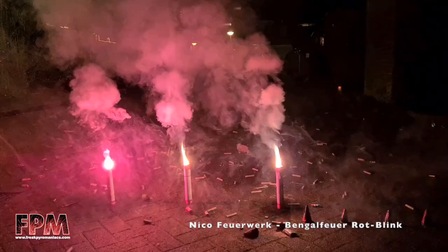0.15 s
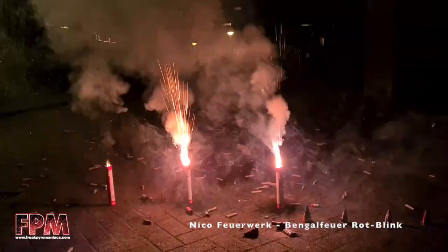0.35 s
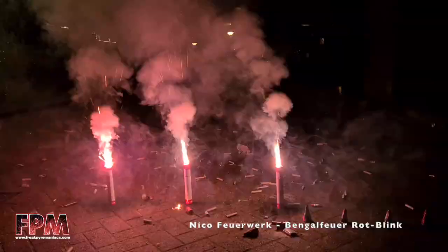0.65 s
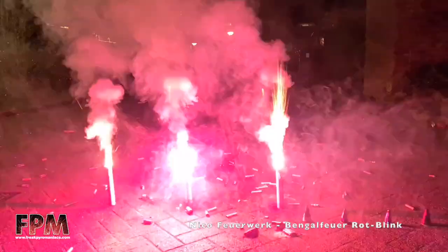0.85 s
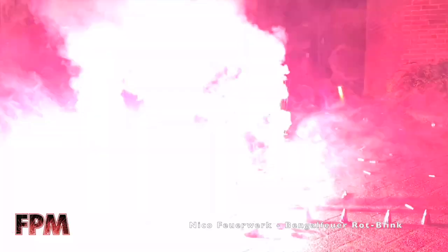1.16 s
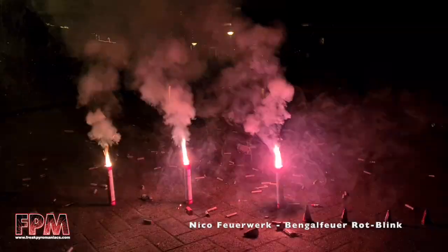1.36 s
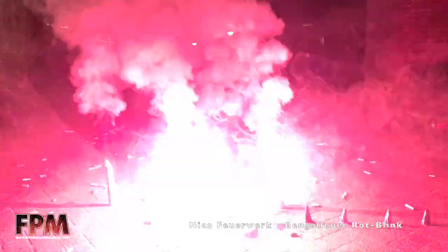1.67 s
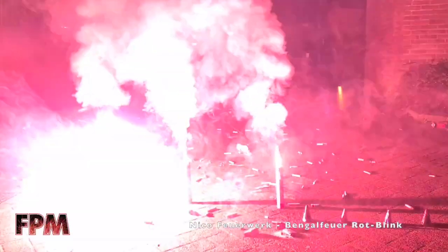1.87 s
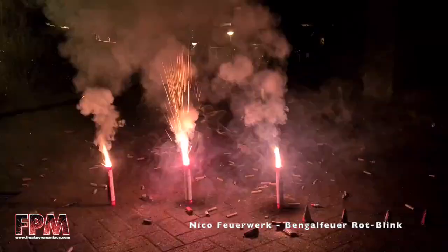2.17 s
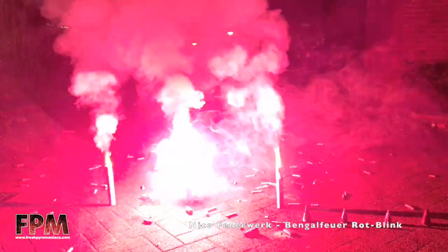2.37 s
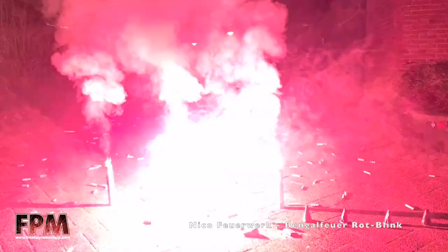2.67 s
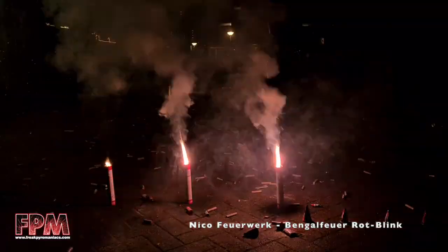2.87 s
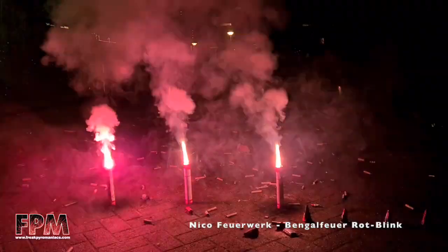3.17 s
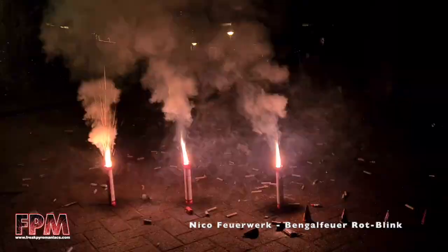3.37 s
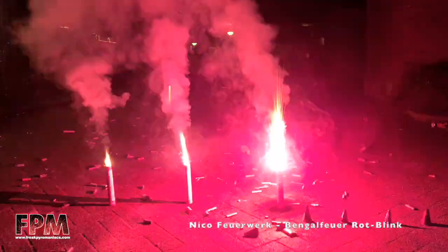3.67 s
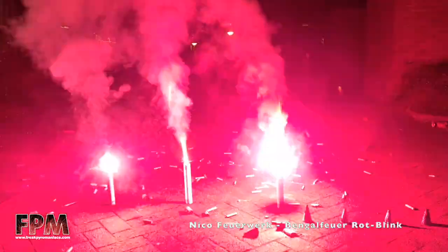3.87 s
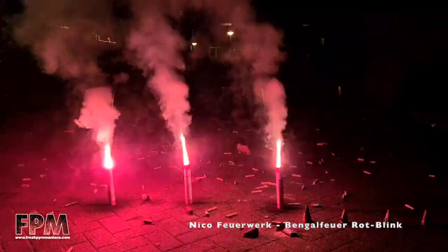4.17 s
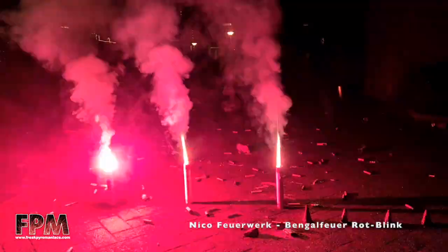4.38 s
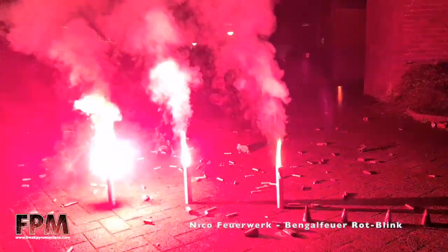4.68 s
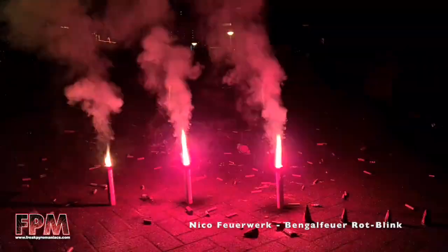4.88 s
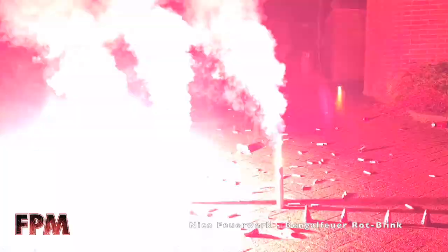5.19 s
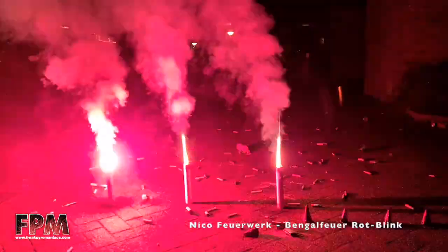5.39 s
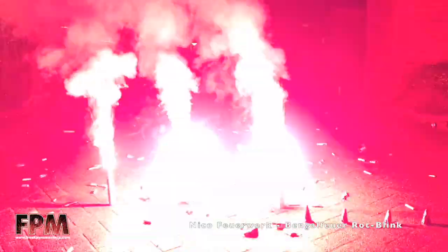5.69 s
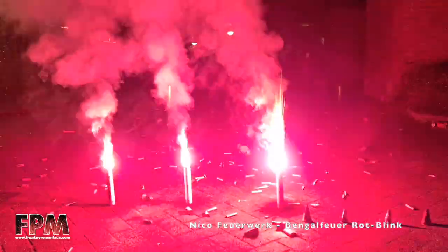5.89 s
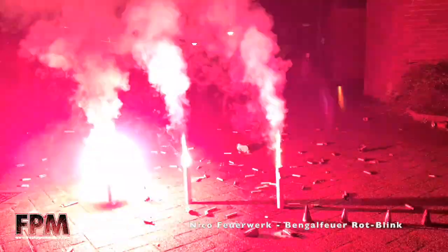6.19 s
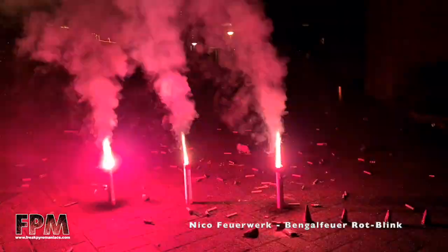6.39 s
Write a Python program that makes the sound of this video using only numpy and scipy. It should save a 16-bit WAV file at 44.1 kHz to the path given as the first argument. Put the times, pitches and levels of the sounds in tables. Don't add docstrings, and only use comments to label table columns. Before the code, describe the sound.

Three strobe flares burn a few metres away on a paved yard at night, each pulsing about four times a second. Short breathy hissing flashes overlap irregularly, swelling and cutting off, with crackly spits between. A deep distant firework booms early; a brighter one knocks and rolls around four seconds. House walls return faint short echoes over quiet town murmur, picked up by a close stereo camera microphone.

```python
import sys
import numpy as np
from scipy import signal
from scipy.fft import rfft, irfft, next_fast_len
from scipy.io import wavfile
from scipy.ndimage import uniform_filter1d, map_coordinates

SR = 44100
rng = np.random.default_rng(int(sys.argv[2]) if len(sys.argv) > 2 else 0)


def transcribe(signal):
    frames = np.atleast_2d(signal).T
    limited = np.clip(frames, -1, 1)
    pcm = np.round(limited * 32767).astype(np.int16)
    wavfile.write(sys.argv[1], SR, pcm)


def volts(x):
    e = np.asarray(x, float) / 20
    return 10 ** e


N = 288414
PADDED = next_fast_len(N, real=True)
HZ = np.maximum(np.fft.rfftfreq(PADDED, 1 / SR), 1)
TIME = np.arange(N) / SR

# (frequency [Hz], level [dB])
JET_TONE = [(40, -0.5), (120, -8.5), (400, -3.5), (850, -5.5), (1350, 2), (2300, -1.24), (3100, 0.6),
            (4500, -1.5), (7000, 2), (10000, -11), (16000, -6)]
# (lag of left port [samples], paving detour [ms], left minus right [dB], roar [dB], fizz [dB])
FLARE_STANDS = [
    (2, 0.4845, -1.0, 1.5, -3),
    (-2.5, 0.485, -0.5, -1, -1.5),
    (-6.5, 0.4403, 0.5, -3, 1.5),
]


def shape(points, column=1):
    points = np.array(points, float)
    return volts(np.interp(np.log(HZ), np.log(points[:, 0]), points[:, column]))


def causal(gain):
    cepstrum = irfft(np.log(gain), PADDED)
    cepstrum[1:PADDED // 2] *= 2
    cepstrum[PADDED // 2 + 1:] = 0
    return np.exp(rfft(cepstrum))


def colour(x, gain):
    return irfft(rfft(x, PADDED) * gain, PADDED)[..., :N]


def unit(x):
    return x / np.sqrt(np.mean(x ** 2))


def walk(rate_hz):
    hold = int(SR / rate_hz)
    steps = rng.standard_normal(2500)[np.arange(N) // hold]
    return 1.3 * uniform_filter1d(uniform_filter1d(steps, hold), hold)


def grains(rate_hz, spread_db):
    when, sign, size = rng.random((3, N))
    clicks = (when < rate_hz / SR) * np.sign(sign - 0.5)
    return unit(clicks * volts(-spread_db * np.log(size + 1e-3)))


def wide(source, tone, alike_hz):
    mid = colour(source(), shape(tone))
    side = colour(source(), shape(tone) * np.minimum(HZ / alike_hz, 1))
    return unit(mid + side * np.array([[1], [-1]]))


def thuds(events, cycles):
    out = np.zeros(N)
    phases = rng.random(len(events))
    for (s, db, hz), phase in zip(events, phases):
        span = slice(int(s * SR), int((s + 0.15) * SR))
        age = (TIME[span] - s) * hz
        swell = (age / cycles * np.exp(1 - age / cycles)) ** 2
        out[span] += volts(db) * swell * np.sin(2 * np.pi * (age + phase))
    return out


def town():
    # (time [s], level [dB])
    murmur = [(0.0, -46), (0.4, -47.5), (0.73, -47.5), (1.37, -51.5), (2.69, -56), (2.86, -49), (3.35, -51),
              (3.99, -49.5), (4.15, -40.5), (4.44, -45), (5.37, -47.5), (6.54, -46.5)]
    # (frequency [Hz], level [dB per Hz])
    town_tone = [(15, -38), (25, 10), (88, 13), (435, 4), (1030, -9), (1820, -12), (3050, -25), (4520, -13),
                 (6530, -8), (9000, -16.5), (11700, -43), (19800, -120)]
    level_db = np.interp(TIME, *np.transpose(murmur)) + 4.17 + 0.5 * walk(24)
    return volts(level_db) * wide(lambda: rng.standard_normal(N), town_tone, alike_hz=960)


def firework(bang, tone, rate_hz, alike_hz):
    s, db, attack_ms, hold_ms, sag_db, fade_db_per_s = bang
    ms = (TIME - s) * 1000
    held_ms = ms - attack_ms
    sag = sag_db * np.clip(held_ms / hold_ms, 0, 1)
    fade = fade_db_per_s * np.maximum(held_ms - hold_ms, 0) / 1000
    roll = wide(lambda: grains(rate_hz, 2.5) + 1.3 * rng.standard_normal(N), tone, alike_hz)
    return np.clip(ms / attack_ms, 0, 1) * volts(db + sag + fade) * roll


def deep_firework():
    # (arrival [s], peak [dB], attack [ms], hold [ms], sag while held [dB], fade [dB per s])
    deep_bang = (0.64, -29.5, 22, 400, -3, -31)
    # (frequency [Hz], level [dB per Hz])
    deep_tone = [(15, -38), (25, -14), (65, -1), (135, -17.5), (239, -34), (273, -67), (300, -25),
                 (390, -51), (660, -120)]
    # (time [s], peak [dB], pitch [Hz])
    booms = [
        (.482, -21.5, 67.3),
        (.552, -19, 74),
        (.588, -24, 80),
        (.676, -23, 66),
        (.715, -21.5, 54.3),
        (.828, -25, 74.5),
    ]
    roll = firework(deep_bang, deep_tone, rate_hz=200, alike_hz=980)
    return volts(-2.5) * roll + thuds(booms, cycles=0.87)


def nearer_firework():
    # (arrival [s], peak [dB], attack [ms], hold [ms], sag while held [dB], fade [dB per s])
    nearer_bang = (4, -22.5, 82, 110, -11.5, -33)
    # (frequency [Hz], level [dB per Hz])
    nearer_tone = [(29, -49), (50, -23), (177, -8), (388, -9.5), (523, -27), (648, -9.5), (837, -24.5),
                   (1500, -27), (1950, -51), (3300, -120)]
    return volts(-2) * firework(nearer_bang, nearer_tone, rate_hz=400, alike_hz=740)


def bang_knocks():
    # (time [s], peak [dB], pitch [Hz])
    knock_events = [(.09, -34, 520), (.05, -37, 348), (.078, -32, 1280), (2.752, -31.5, 198),
                    (2.77, -37, 300), (2.79, -48, 250), (2.85, -48, 250), (3.49, -39, 350),
                    (3.52, -33, 250), (3.55, -30, 700), (2.815, -29, 211), (2.835, -38, 350),
                    (3.535, -30, 300), (3.585, -32.5, 350), (3.505, -26, 500), (3.565, -26, 560),
                    (3.978, -22, 224), (4.002, -19, 210), (4.021, -17, 446), (4.042, -16, 630),
                    (4.049, -14.5, 594), (4.063, -29, 380), (4.09, -20, 165), (4.112, -12.5, 171),
                    (4.121, -20, 186), (4.143, -26, 200), (4.17, -20.5, 345), (4.22, -27, 196)]
    return thuds(knock_events, cycles=0.81)


def yard(x, t60_s=0.22, gap_s=0.011, damp_hz=5000, alike_hz=450):
    tail = rng.standard_normal((2, N)) * (TIME > gap_s) * np.exp(-np.log(1000) * TIME / t60_s)
    tail /= np.sqrt(np.sum(tail ** 2, axis=1, keepdims=True))
    echo = rfft(tail, PADDED)
    echo = echo[0] + (echo - echo[0]) * np.minimum(HZ / alike_hz, 1)
    return colour(x, echo / (1 + HZ / damp_hz))


def stand(x, lag, detour_ms, pan_db, mirror=0.76, mirror_hz=9000, sway=0.055):
    late = np.arange(N) - detour_ms / 1000 * SR * (1 + sway * walk(9))
    paving = colour(map_coordinates(x, [late], order=3), mirror / (1 + (HZ / mirror_hz) ** 2))
    turn = -2j * np.pi * HZ / SR
    ports = [np.exp(turn * side * lag) * volts(side * pan_db) for side in (0.5, -0.5)]
    return np.array([colour(x + paving, port) for port in ports])


def puffs():
    # (time [s], peak [dB], pitch [Hz])
    puff_events = [(0.239, -52, 48.4), (1.665, -33, 69), (1.961, -29.5, 72), (2.219, -44, 96),
                   (2.733, -35, 98), (2.976, -28, 75.4), (3.218, -37, 106), (3.608, -45, 53.5),
                   (4.48, -37, 106), (4.72, -32, 77.5), (4.928, -33, 76.6), (5.127, -37, 72),
                   (5.189, -32, 91), (5.4, -29, 94.5), (5.648, -39, 43.4), (5.897, -32, 107),
                   (6.053, -34, 73.4), (6.439, -36, 40.4)]
    return thuds(puff_events, cycles=1.0)


def spits(fade_ms=10):
    # (time [s], peak [dB])
    bursts = [(0.0014, -26), (0.039, -35), (0.0835, -31.5), (0.1117, -30), (0.1281, -31.5), (0.1765, -32),
              (0.3895, -43), (0.416, -46), (0.447, -27), (0.5227, -19), (0.747, -20.5), (1.005, -31),
              (1.0344, -34), (1.304, -26), (1.3592, -27), (1.8154, -22), (2.4236, -23.5), (2.5394, -37),
              (2.5774, -40.5), (2.6055, -36), (2.868, -30.5), (2.8844, -39), (3.428, -27), (3.551, -26),
              (3.618, -27), (5.0887, -26), (5.143, -13), (5.2294, -23), (5.356, -24), (5.774, -26)]
    envelope = np.zeros(N)
    for s, db in bursts:
        span = slice(int(s * SR), int((s + 0.2) * SR))
        envelope[span] += volts(db - 8.5) * np.exp(-(TIME[span] - s) * 1000 / fade_ms)
    sparks = volts(-52.5) * grains(60, 4.4)
    crackle = unit(rng.standard_normal(N) + 0.5 * grains(1500, 3.0))
    return colour(sparks + envelope * crackle, shape(JET_TONE) * np.minimum(HZ / 900, 1))


def burn(flashes, dulling, lean, light_db=-14, ember=0.091, ember_ms=115):
    power = np.full(N, 1e-14)
    sputter = volts(6.05 * walk(80))
    for s, db, swell_ms, fall_ms in flashes:
        bright_db = dulling[0] + dulling[1] * s
        span = slice(max(int((s - swell_ms / 1000) * SR), 0), int((s + 0.5) * SR))
        ms = (TIME[span] - s) * 1000
        away_ms = np.abs(ms)
        swell = volts(2 * light_db * (away_ms / swell_ms) ** 1.036)
        fall = np.exp(-(away_ms / (1.35 * fall_ms)) ** 1.414)
        fall = fall + (ember * sputter[span]) ** 2 * np.exp(-2 * away_ms / ember_ms)
        power[span] += np.where(ms < 0, swell, fall) * volts(2 * (db + lean * bright_db))
    return np.sqrt(uniform_filter1d(power, size=120))


def flare(flashes, dulling, roar_db, fizz_db):
    jet = colour(rng.standard_normal(N) + 0.4 * grains(2500, 2.5), shape(JET_TONE))
    below = [1 / (1 + (HZ / hz) ** 4) for hz in (150, 900, 3000, 9500)]
    even = burn(flashes, dulling, lean=0)
    dark = burn(flashes, dulling, lean=-1.42)
    bright = burn(flashes, dulling, lean=1.36)
    rumble = np.sqrt(even * dark) * colour(jet, below[1] - 0.28 * below[0])
    rumble = volts(-0.36 + 2.8 * walk(75)) * rumble
    roar = dark * colour(jet, below[2] - below[1])
    roar = volts(roar_db + 2.0 * walk(70) + 1.48 * walk(6.106)) * roar
    hiss = volts(0.28 * walk(80)) * even * colour(jet, below[3] - below[2])
    fizz = volts(fizz_db + 1.5 * walk(90)) * bright * colour(jet, 1 - below[3])
    flutter = volts(2.0 + 1.0 * walk(110) + 1.32 * walk(330))
    return flutter * (rumble + roar + hiss + fizz)


def strobe_flares():
    # (time of peak [s], level [dB], swell [ms], fall [ms])
    right_flashes = [(0.246, -24.5, 28, 16), (0.522, -24, 30, 6.9), (0.805, -25, 48, 12.3),
                     (1.095, -25, 33.5, 16), (1.184, -30.5, 60, 9.1), (1.421, -23.5, 37, 8.3),
                     (1.685, -31.5, 96, 22), (1.977, -26, 54, 12), (2.098, -27.5, 31, 9),
                     (2.232, -27, 36, 10), (2.329, -37.5, 61, 25), (2.473, -25, 31.4, 10.7),
                     (2.722, -28, 82, 13.2), (2.965, -27, 42, 12), (3.216, -29, 74, 23),
                     (3.456, -27, 35, 15), (3.627, -29.5, 15.5, 14), (3.833, -29, 41, 26.5),
                     (4.043, -29, 42, 19), (4.26, -32, 82, 17), (4.5, -29, 35, 13.7), (4.74, -33, 93, 19),
                     (4.952, -35, 38, 14), (5.203, -31, 28, 13), (5.431, -25.5, 28, 9.7),
                     (5.659, -35.5, 17, 31), (5.857, -30, 51, 14), (6.073, -28, 35, 9.6),
                     (6.257, -31, 48, 12.6), (6.464, -34.5, 16, 20),
                     (1.294, -38.5, 39, 14),
        (3.746, -39, 23, 8.5),
        (6.366, -41, 12.5, 7.7),
    ]
    # (time of peak [s], level [dB], swell [ms], fall [ms])
    middle_flashes = [(0.267, -28.5, 49.7, 12.5), (0.561, -25, 44.6, 8.5), (0.887, -26, 46.6, 16.5),
                      (1.155, -31.5, 48, 12), (1.414, -26.5, 53, 17), (1.696, -25, 51.6, 7.9),
                      (2.094, -29, 38.7, 17.3), (2.244, -25.5, 37.8, 6.3), (2.334, -28, 40, 20),
                      (2.663, -24.5, 32, 7.8), (2.968, -26.5, 46, 18), (3.236, -29.5, 51.3, 11),
                      (3.499, -28.5, 45, 19), (3.711, -30, 51, 36), (4.03, -27, 44, 14),
                      (4.16, -42, 43, 21), (4.264, -28.5, 48, 17.7), (4.502, -28.5, 46, 18.4),
                      (4.737, -29, 52, 23), (4.87, -37, 37, 15), (4.96, -25, 49, 14),
                      (5.201, -27.5, 47.5, 19), (5.415, -37.5, 60, 35), (5.665, -26.5, 42.4, 10.3),
                      (5.916, -28.5, 46, 12), (6.203, -30, 47, 18), (6.468, -28.5, 43.2, 11)]
    # (time of peak [s], level [dB], swell [ms], fall [ms])
    left_flashes = [(0.522, -23.5, 27.6, 15), (0.59, -38, 39, 46), (0.766, -27, 34, 14),
                    (1.143, -27, 49, 25), (1.838, -24.5, 31.5, 21.6), (2.242, -26.5, 38.2, 20),
                    (2.994, -21, 39.5, 11), (3.298, -25.5, 42, 13.4), (3.875, -27, 36.5, 33.5),
                    (4.073, -30.5, 42, 21), (4.175, -34, 43, 20), (4.412, -25, 37.2, 17.7),
                    (4.663, -25.5, 55.4, 20), (5.151, -26, 37.6, 19), (5.268, -29, 41.4, 17.6),
                    (5.416, -28.5, 69, 27), (5.634, -27.5, 52.7, 26.5), (5.918, -29.5, 41.7, 28),
                    (6.167, -28, 40.4, 20), (6.407, -28, 52.4, 37)]
    # (brightness at start [dB], change [dB per s])
    tube_dulling = [
        (1.5, -0.85),
        (3.5, -1.13),
        (2, -0.61),
    ]
    trains = (right_flashes, middle_flashes, left_flashes)
    jets = [flare(flashes, dulling, *place[3:])
            for flashes, dulling, place in zip(trains, tube_dulling, FLARE_STANDS)]
    jets[2] = jets[2] + spits()
    jets[0] = jets[0] + volts(-3.5) * spits()
    return jets


def scene():
    jets = strobe_flares()
    near = sum(stand(jet, *place[:3]) for jet, place in zip(jets, FLARE_STANDS)) + puffs()
    knocks = bang_knocks()
    far = deep_firework() + nearer_firework() + knocks
    echoes = volts(-15.5) * yard(sum(jets) + volts(10.5) * knocks)
    return near + echoes + far + town()


def band_limit(x):
    return signal.sosfilt(signal.butter(12, 16500, fs=SR, output="sos"), x)


def record(dry):
    # (frequency [Hz], left [dB], right [dB])
    port_tone = [(30.2, -6, -6.5), (60, -1, -1), (2330, -1, 0), (3400, 2.5, 4.5), (4840, 0, 6.5),
                 (7120, -1, 0), (7200, -5, -3), (8290, 5.5, -16), (8750, 1, -2.5), (11500, 8, 11.5),
                 (12140, -1.1, 8), (14040, 7.5, 1), (14360, -4, 8.5), (16400, -0.5, 0.5)]
    top_hz = 15750
    mix = np.array([colour(dry[k], (HZ < top_hz) * causal(shape(port_tone, column=k + 1)))
                    for k in range(2)])
    return band_limit(mix)


dry = scene()
out = record(dry)
transcribe(out)
```